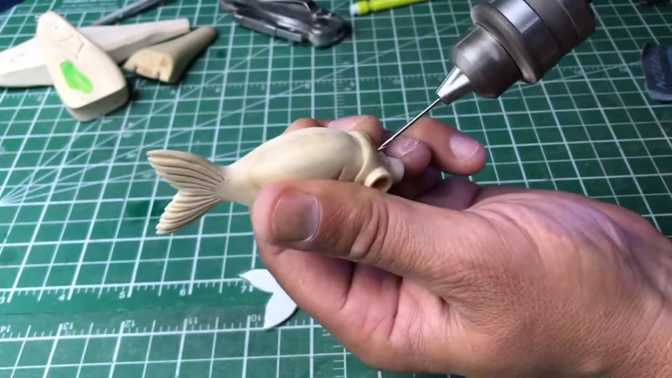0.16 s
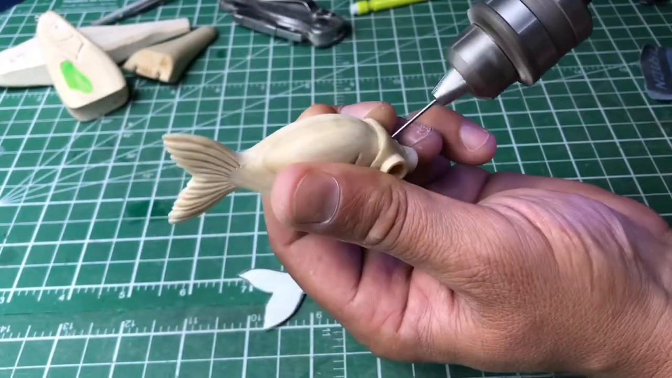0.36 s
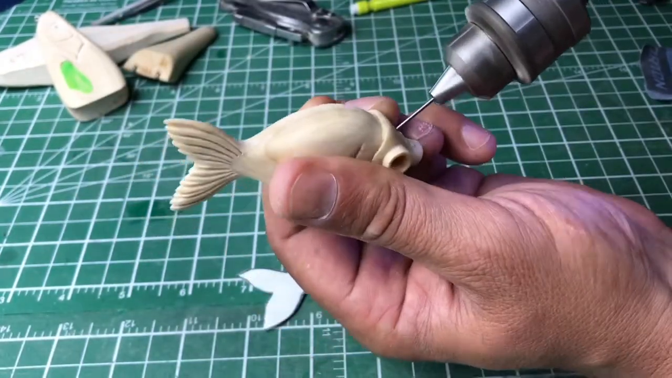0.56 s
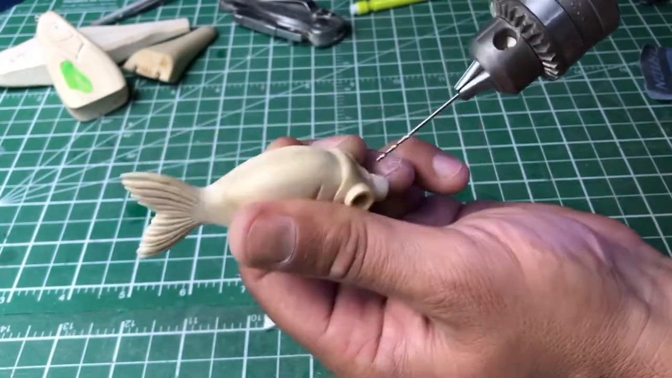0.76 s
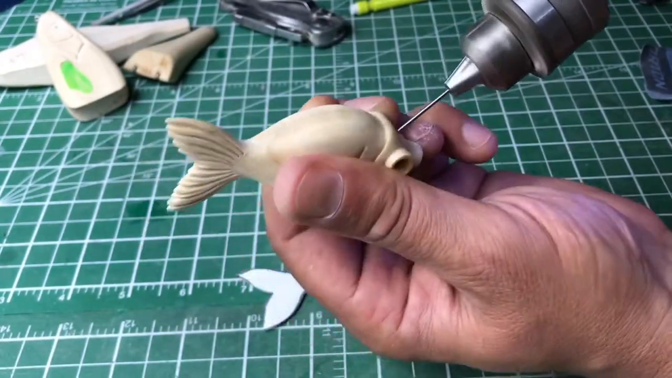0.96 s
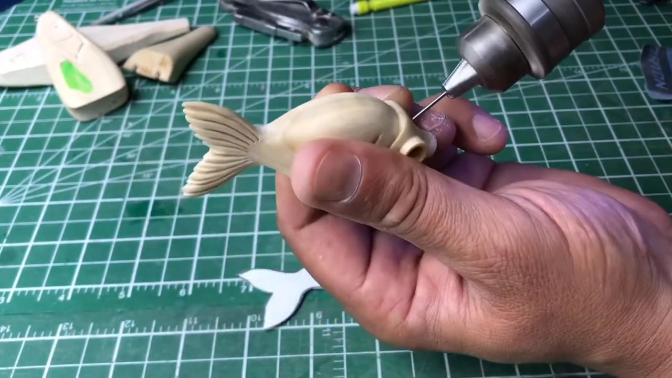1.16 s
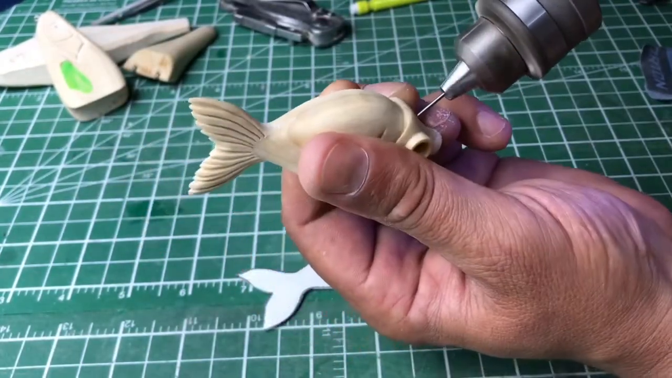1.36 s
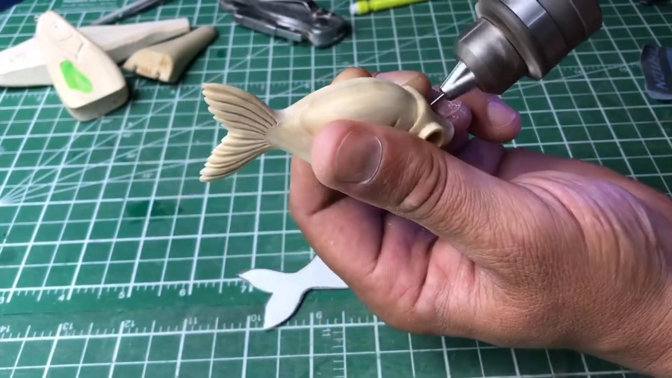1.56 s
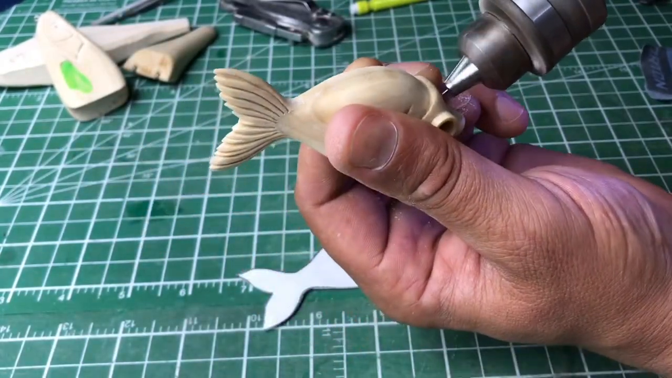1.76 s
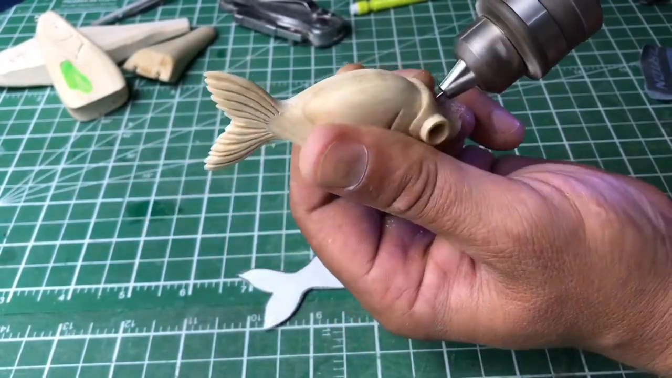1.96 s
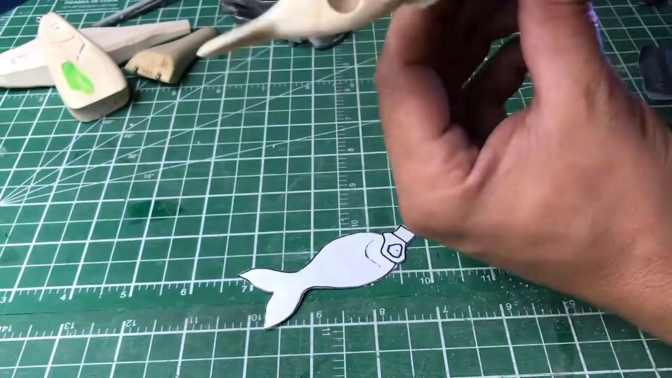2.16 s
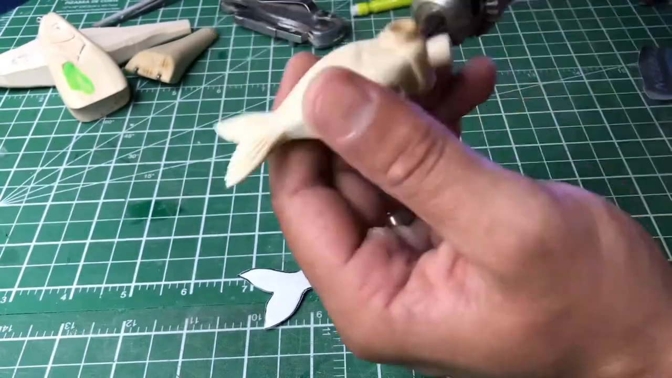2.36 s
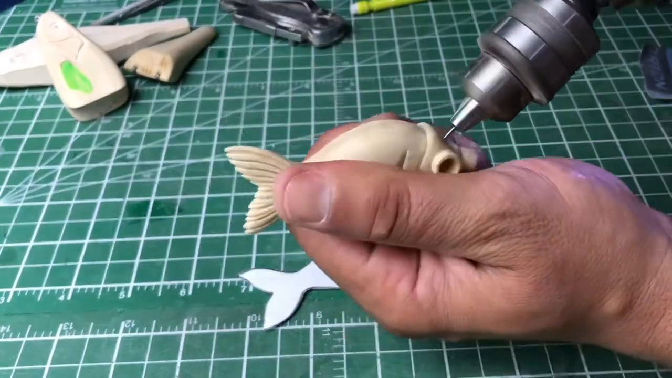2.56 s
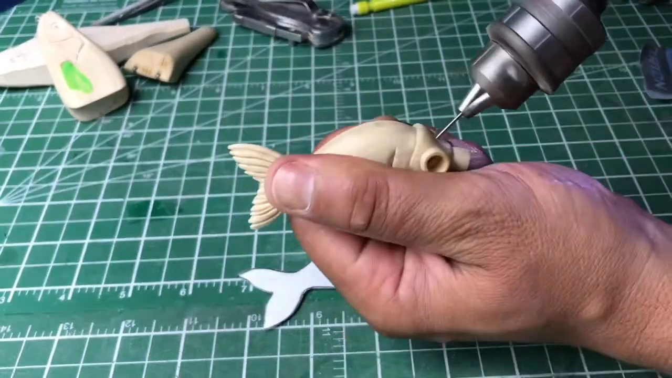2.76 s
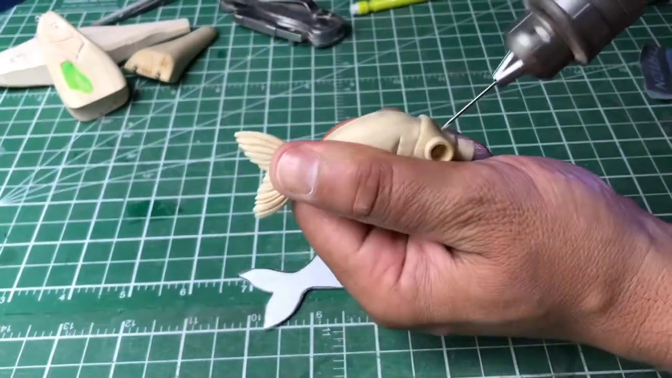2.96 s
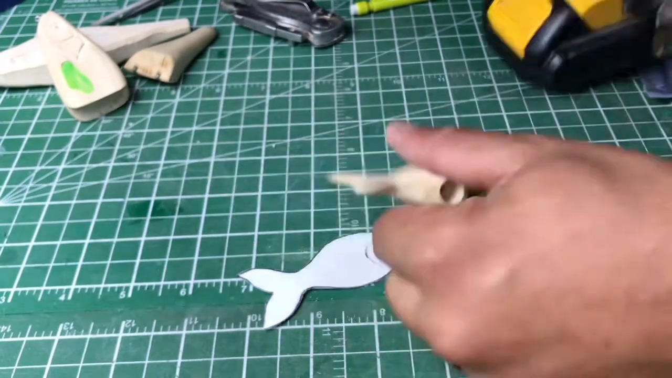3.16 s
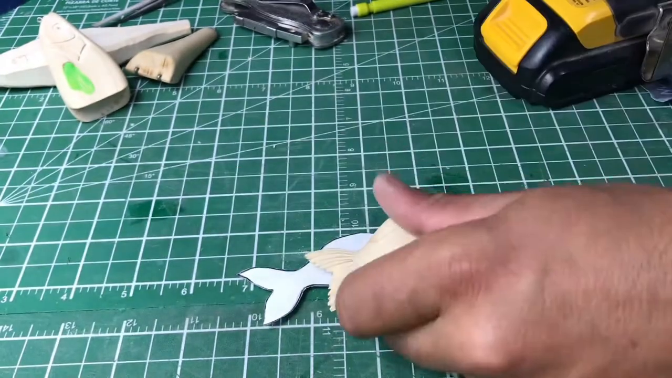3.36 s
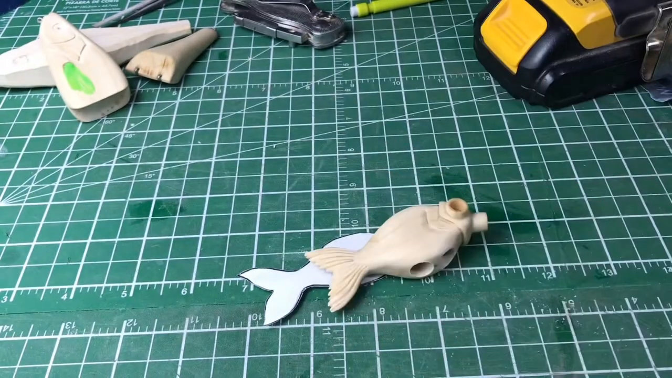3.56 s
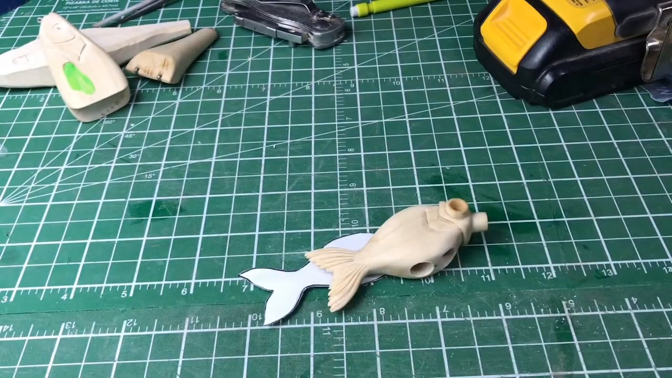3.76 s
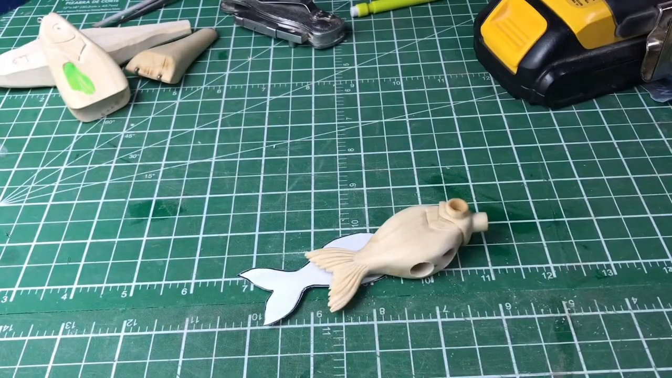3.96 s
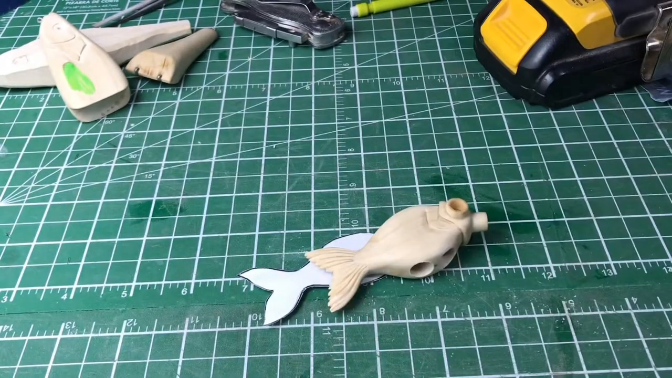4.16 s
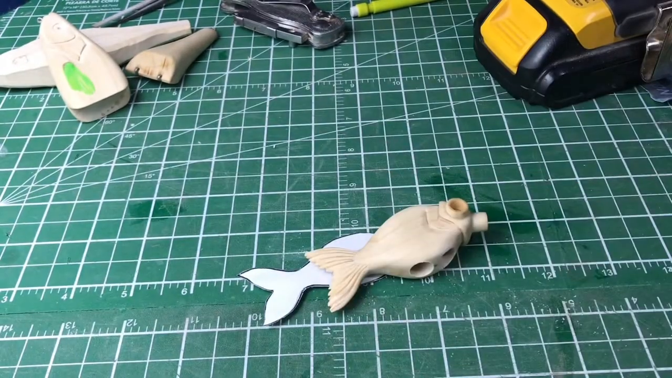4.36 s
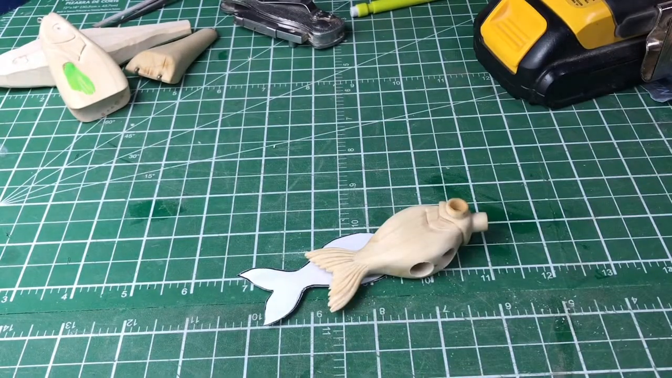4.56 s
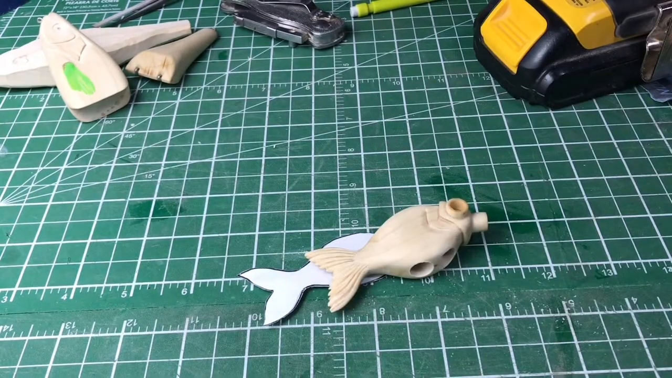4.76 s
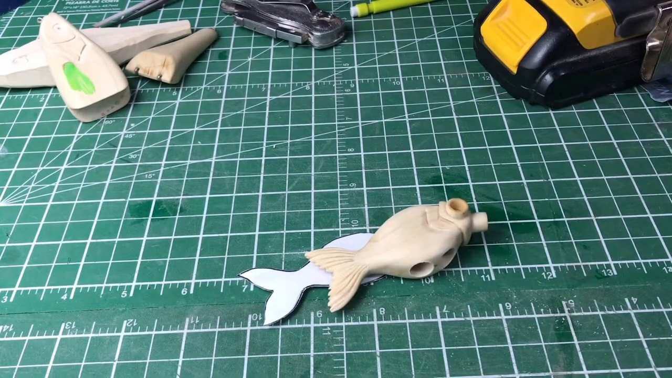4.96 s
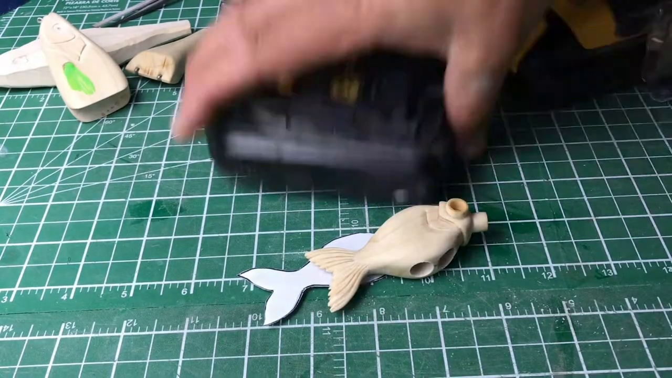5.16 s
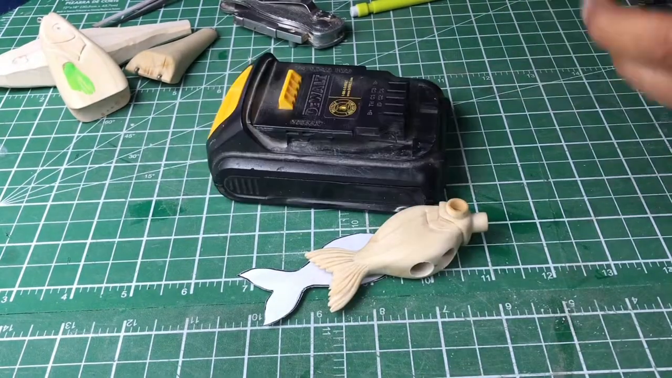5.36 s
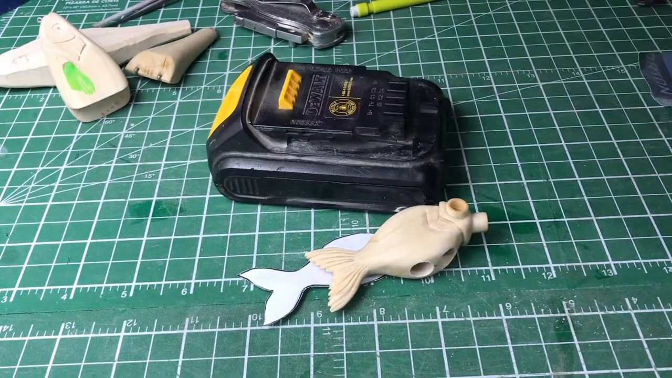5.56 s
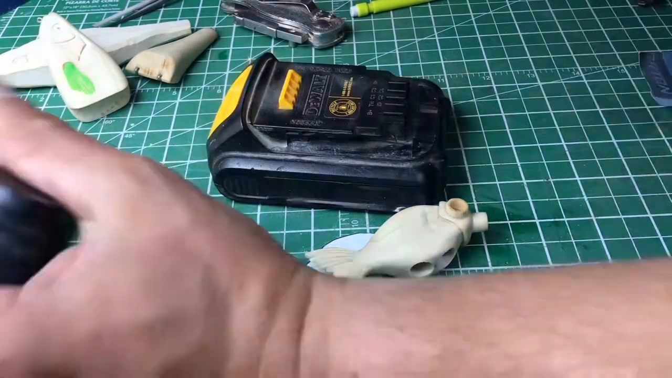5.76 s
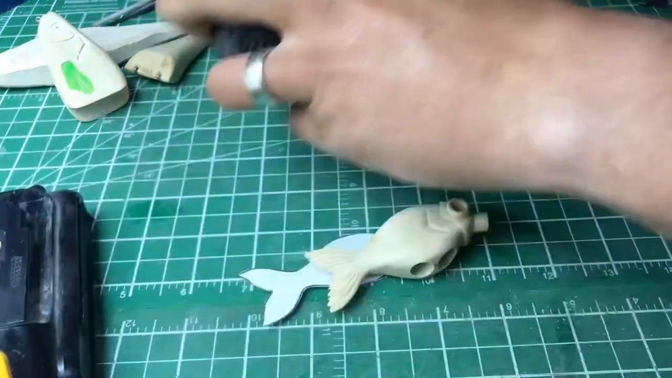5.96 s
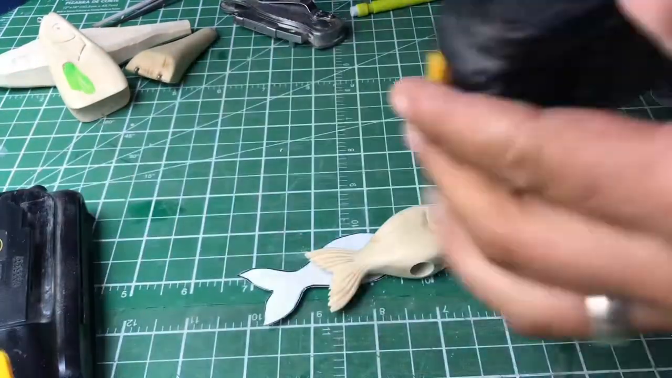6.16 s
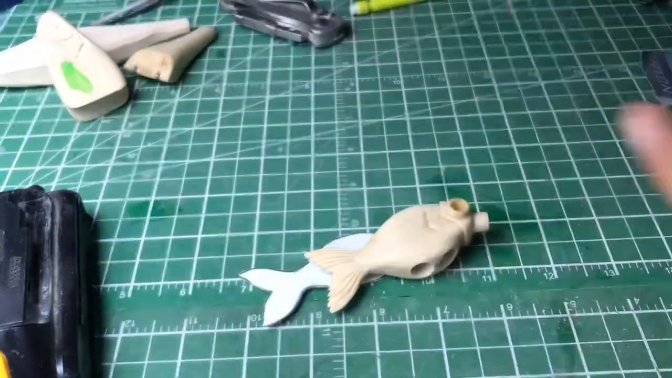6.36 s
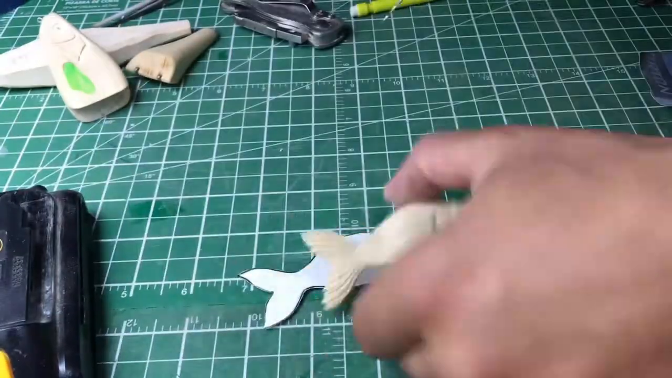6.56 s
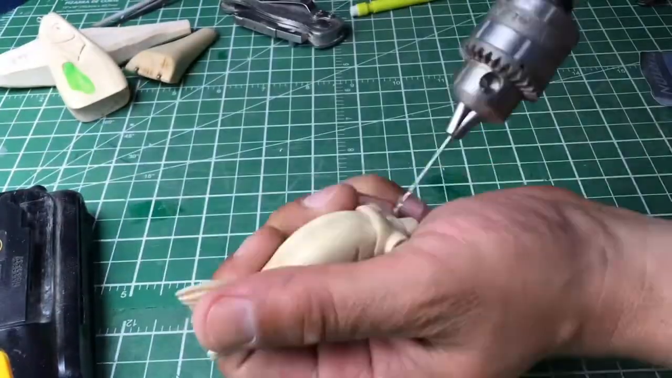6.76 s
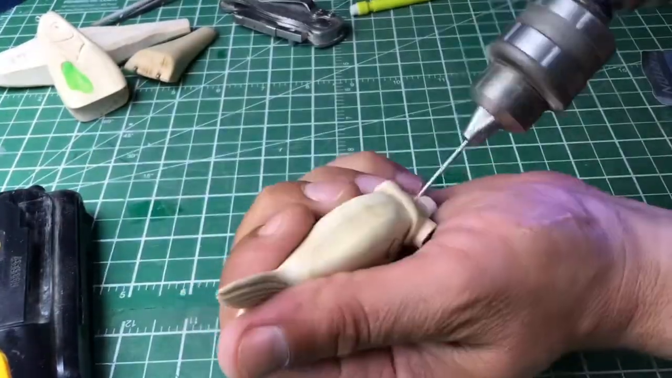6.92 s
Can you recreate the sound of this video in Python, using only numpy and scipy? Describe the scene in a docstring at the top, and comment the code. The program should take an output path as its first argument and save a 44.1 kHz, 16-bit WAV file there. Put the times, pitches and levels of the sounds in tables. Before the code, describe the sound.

Close, dry workshop sound of a small electric drill boring a wooden carving. Two bright, raspy whining bursts sag in pitch, then a slower, weaker one. The tool scrapes and knocks on a matted bench, a plastic battery clicks off and another snaps in with sharp clacks. After a quiet moment of light handling, the drill spins up freely, rising to a high whine as it ends.

```python
"""A small hand drill runs in four short bursts, boring into a wooden carving and at last spinning free.
Every line of the motor is locked to the shaft; armature and gears whine over the rasp of the brushes.
Each burst spins up, and all but the last then sag. Before the last one the tool knocks on the bench,
its plastic battery is pulled off and a fresh one snapped in: blows that ring modes with a crack and a tick.
Skin crackle, small ringing parts, a faint echo, room air and a late low hum lie underneath."""
import sys
import numpy as np
from scipy import signal
from scipy.fft import rfft, irfft
from scipy.io import wavfile
from scipy.ndimage import uniform_filter1d, map_coordinates

SR = 44100
rng = np.random.default_rng(int(sys.argv[2]) if len(sys.argv) > 2 else 0)


def wrap_up_sound(samples):
    """Save the sound to the file named by the first command line argument, as 16-bit audio."""
    columns = np.atleast_2d(samples).T
    # keep every value between -1 and 1, then stretch to whole-number steps
    tamed = np.clip(columns, -1, 1)
    steps = np.round(tamed * 32767).astype(np.int16)
    wavfile.write(sys.argv[1], SR, steps)


N = 312669
TIME = np.arange(N) / SR  # s
TOP_HZ = 15950  # upper band limit


def undb(db):
    """Level law: decibels to amplitude gain."""
    return 10 ** (np.asarray(db) / 20)


def unit(x):
    """Normalisation: scale to rms 1."""
    return x / np.sqrt(np.mean(x ** 2))


def colour(x, points):
    """Minimum-phase filtering: (frequency [Hz], gain [dB]) points become a causal response by the cepstrum."""
    size = 4096
    hz, db = np.transpose(points)
    bin_hz = np.arange(size // 2 + 1) * SR / size
    gain_db = np.interp(np.log(bin_hz + 1), np.log(hz), db)
    cepstrum = irfft(np.log(undb(gain_db)))
    # folding the cepstrum onto positive time makes the response causal
    cepstrum[1:size // 2] *= 2
    cepstrum[size // 2 + 1:] = 0
    response = irfft(np.exp(rfft(cepstrum)))
    return signal.fftconvolve(x, response)[:len(x)]


def walk(t, rate):
    """Band-limited fluctuation: random knots, rate per second, joined smoothly, with spread near 1."""
    steps = (t - t[0]) * rate
    knots = rng.standard_normal(int(steps[-1]) + 2)
    return map_coordinates(knots, [steps], order=3, mode="nearest")


def shaft_speed(t, speed):
    """Rotor inertia: the speed curve is rounded, wavers slightly, and falls under the brake."""
    rows = np.array(speed)
    stop = rows[-1, 0]
    hz = uniform_filter1d(np.interp(t, *rows.T), size=600, mode="nearest")
    hz = hz * (1 + 0.0011 * walk(t, 72.4))
    # the trigger is let go just before the end, unless the scene ends first
    if stop < TIME[-1] - .1:
        hz = hz * np.exp(-np.maximum(t - stop + 0.009, 0) / 0.08)
    return hz


def line(t, angle, multiple, play, flutter_db):
    """Phase locking: a partial of rms near 1 follows the shaft, loosened by play [rad] in the bearings."""
    phase = multiple * angle + rng.uniform(0, 2 * np.pi) + play * walk(t, 180)
    return np.sqrt(2) * np.sin(phase) * undb(flutter_db * walk(t, 90.9))


# the carving radiates little of the shaft hum below its corner; level against the cutting
SHAFT_HUM_DB, HUM_CORNER_HZ = 1.5, 527
HUM_SWELL_S = 0.069  # the hum swells in from the start of a burst


def shaft_hum(t, start, hz, angle, cut_db):
    """Low-frequency radiation limit: shaft hum is radiated well only above a corner frequency."""
    swell = np.clip((t - start) / HUM_SWELL_S, 0, 1) ** 2
    radiated = undb(cut_db + SHAFT_HUM_DB) / (1 + (HUM_CORNER_HZ / hz) ** 10)
    return swell * radiated * line(t, angle, 0.99, play=0.38, flutter_db=2.0)


SLOTS, GEAR_MESH = 7, 16.06  # multiples of the shaft rate
# the load is full once the speed has sagged by this share of its peak so far
FULL_LOAD_SAG, ARMATURE_LOAD_DB, GEAR_LOAD_DB = 0.14, 3.5, 12.5
# resonances of the motor shell: (frequency [Hz], gain [dB])
SHELL_RESONANCES = [(2100, -28.5), (2900, -18.5), (3300, -11.5), (3950, -0.5), (4450, -14), (4950, -18.5),
                    (5400, -26.5), (6000, -16), (6330, -5.5), (6800, -5), (7500, -18.5), (8950, 0),
                    (10600, -8.5), (12300, 4), (13200, 5), (14700, 1.5), (16000, 2)]


def armature_and_gears(t, hz, angle, armature_db, octave_db, gear_db):
    """Order tracking through resonances: whines flare as they glide, and two of them harden as the speed sags."""
    def shell(multiple):
        gain_db = np.interp(multiple * hz, *np.transpose(SHELL_RESONANCES))
        return undb(armature_db + gain_db) * (multiple * hz < TOP_HZ)

    load = np.clip((1 - hz / np.maximum.accumulate(hz)) / FULL_LOAD_SAG, 0, 1)
    armature = line(t, angle, SLOTS, play=.1, flutter_db=0.73)
    octave = line(t, angle, 2 * SLOTS, play=0.26, flutter_db=0.75)
    gears = line(t, angle, GEAR_MESH, play=0.48, flutter_db=2.0)
    whine = undb(ARMATURE_LOAD_DB * (load - 1)) * shell(SLOTS) * armature
    whine += undb(octave_db) * shell(2 * SLOTS) * octave
    whine += undb(gear_db + GEAR_LOAD_DB * (load - 1.5)) * shell(GEAR_MESH) * gears
    return whine


# how the housing radiates: (frequency [Hz], gain [dB])
HOUSING_RADIATION = [(400, -49.5), (1500, -14.5), (2200, -9), (2700, -16), (3700, -3), (4400, -10.5),
                     (5100, -16.5), (5900, -8.5), (6700, -5), (8000, -4.5), (9200, -1.5), (10500, -2.5),
                     (13000, 1.5), (15700, 0.5)]
# weaker lines of the motor: (multiple of the shaft rate [1], relative level [dB])
MOTOR_LINES = [(2, -8), (3, -13), (4, -16), (5, -13.5), (6, -19.5), (8, -18), (9, -14.5), (10, -29),
               (11, -21), (12, -18), (13, -11.5), (15, -5.5), (17, -6), (19, -11), (20, -21), (21, -5.5),
               (26, -8.5), (27, -20), (28, -8.5), (34, -6.5)]
# weaker lines of the gearbox: (multiple of the shaft rate [1], relative level [dB])
GEARBOX_LINES = [(7.7, -14.5), (11.38, -10), (13.75, -17), (15.56, -4.5), (30.88, -6), (31.12, -36),
                 (32.12, -4.5)]


def weak_lines(t, hz, angle):
    """Order spectrum: further motor and gearbox partials, weighted by the radiation of the housing."""
    housing_hz, housing_db = np.transpose(HOUSING_RADIATION)
    total = 0
    for multiple, db in MOTOR_LINES + GEARBOX_LINES:
        radiated_db = np.interp(np.log(multiple * hz), np.log(housing_hz), housing_db)
        gain = undb(db + radiated_db) * (multiple * hz < TOP_HZ)
        total = total + gain * line(t, angle, multiple, play=0.044 * multiple, flutter_db=3.5)
    return total


def brush_rasp(t, angle):
    """Amplitude-modulated noise: sparks come in uneven spurts as the slots pass the brushes."""
    slot_beat = 1 + 0.56 * np.cos(SLOTS * angle)
    shaft_beat = 1 + 0.42 * np.cos(angle)
    sparks = rng.standard_normal(len(t)) * slot_beat * shaft_beat * undb(1.1 * walk(t, 860))
    return unit(colour(colour(sparks, HOUSING_RADIATION), [(9000, 0.026), (14000, 2.8)]))


# the carving and the bit that cuts it: (frequency [Hz], gain [dB])
CARVING_RESPONSE = [(200, -40.5), (450, -5), (720, 9.5), (1000, -5), (1280, -1.5), (1650, 7.5), (2100, 2.5),
                    (2800, -8.5), (3700, -9), (4600, -17), (7000, -14)]


def cutting(t, angle):
    """Filtered fracture noise: the flutes tear fibres in time with the chuck, geared down 22 to 1."""
    fibres = rng.standard_normal(len(t)) * undb(0.97 * walk(t, 350))
    return unit(colour(fibres * (1 + 0.11 * np.cos(angle / 22)), CARVING_RESPONSE))


RATED_HZ, RASP_DB_PER_OCTAVE = 1000, 3.5  # the rasp grows with shaft speed
COAST_S = 0.0068  # decay constant of the sound after the last speed point


def drill(speed, rasp_db, armature_db, octave_db, gear_db, lines_db, cut_db):
    """Superposition on one shaft: a pull of the trigger sums hum, whine, brush rasp, weak lines and cutting."""
    start, stop = speed[0][0], speed[-1][0]
    on = (TIME > start - .01) & (TIME < stop + .06)
    t = TIME[on]
    hz = shaft_speed(t, speed)
    angle = 2 * np.pi * np.cumsum(hz) / SR
    table_hz = np.interp(t, *np.transpose(speed))
    brush_db = rasp_db + RASP_DB_PER_OCTAVE * np.log2(table_hz / RATED_HZ)
    sound = shaft_hum(t, start, hz, angle, cut_db)
    sound += armature_and_gears(t, hz, angle, armature_db, octave_db, gear_db)
    sound += undb(brush_db) * (brush_rasp(t, angle) + undb(lines_db) * weak_lines(t, hz, angle))
    sound += undb(cut_db) * cutting(t, angle)
    fade_in = np.clip((t - start + 0.0035) / 0.012, 0, 1)
    coast = np.exp(-np.maximum(t - stop, 0) / COAST_S)
    out = np.zeros(N)
    out[on] = sound * fade_in * coast
    return out


# motor speed in the first burst, spinning up and sagging: (time [s], shaft rate [Hz])
FIRST_SPEED = [(0.03, 299.6), (0.036, 376), (0.042, 466), (0.05, 574), (0.062, 727), (0.07, 789),
               (0.1, 940), (0.132, 1022), (0.178, 1078), (0.244, 1016), (0.43, 911), (0.512, 907),
               (0.552, 883), (0.61, 884)]
# the second burst, with a long deep sag: (time [s], shaft rate [Hz])
SECOND_SPEED = [(0.78, 293), (0.788, 390), (0.8, 508.6), (0.828, 684.7), (0.856, 780), (0.884, 829),
                (0.924, 864.3), (1.004, 741.8), (1.126, 666.7), (1.238, 635.7), (1.314, 573.5),
                (1.404, 563), (1.48, 520.5), (1.566, 508.5), (1.64, 457.1), (1.716, 427), (1.885, 419)]
# the third burst, slow and sagging: (time [s], shaft rate [Hz])
THIRD_SPEED = [(2.31, 241.4), (2.33, 328), (2.35, 400.6), (2.396, 472.5), (2.462, 389.3), (2.636, 332),
               (2.72, 329.3), (2.772, 296.3), (2.93, 292.8)]
# the fourth burst, spinning up freely until the scene ends: (time [s], shaft rate [Hz])
FOURTH_SPEED = [(6.755, 187.6), (6.765, 283.7), (6.779, 412), (6.793, 560), (6.817, 767), (6.837, 856.9),
                (6.957, 1196), (7.001, 1275), (7.09, 1298)]


def bursts():
    """Speed-controlled excitation: four pulls of the trigger, the last unloaded with its cutting nearly silent."""
    out = drill(FIRST_SPEED, rasp_db=-44.5, armature_db=-43.5, octave_db=-7.5, gear_db=0,
                lines_db=-5.5, cut_db=-60)
    out += drill(SECOND_SPEED, rasp_db=-45, armature_db=-42, octave_db=-7, gear_db=-6,
                 lines_db=-6.5, cut_db=-59.5)
    out += drill(THIRD_SPEED, rasp_db=-46.3, armature_db=-39.5, octave_db=-11.5, gear_db=-11.5,
                 lines_db=-6.5, cut_db=-77.5)
    out += drill(FOURTH_SPEED, rasp_db=-44.5, armature_db=-41, octave_db=-10.5, gear_db=-8,
                 lines_db=-8.5, cut_db=-76)
    return out


# the crack of a contact: (frequency [Hz], gain [dB])
CRACK_SPECTRUM = [(100, -41.5), (600, -18), (1900, -11), (2700, -5.5), (3300, -4.5), (4200, -1.5),
                  (5200, -4), (6100, -7.5), (7000, -3), (8500, -9), (16000, -40.5)]
# the tick of a contact: (frequency [Hz], gain [dB])
TICK_SPECTRUM = [(2000, -33), (6000, -12), (8000, -4.5), (11000, -0.5), (14000, -4), (16000, -1)]


def hits(blows, modes, thump, chatter, spot_db, tail_db, tail_s, crack_s, tick_s, body_db, crack_db, tick_db):
    """Modal impact: each blow rings the body's modes; the rough contact adds a crack and a tick with faint tails."""
    out = np.zeros(N + SR)
    t = TIME[:SR // 5]
    mode_hz, mode_db, t60 = np.transpose(modes)[:, :, None]
    for s, low, middle, treble, contact_ms, spot_hz in blows:
        grit = rng.standard_normal((3, len(t)))
        strike, detune = rng.standard_normal((2, len(modes), 1))
        contact_s = max(contact_ms, .1) / 1000
        # every blow lands on another spot and weights the modes anew
        spot = [(spot_hz / 1.25, 0), (spot_hz, spot_db), (spot_hz * 1.25, 0)]
        weight_db = mode_db + np.interp(mode_hz, *np.transpose(spot)) + 2.6 * strike
        partials = np.cos(2 * np.pi * mode_hz * (1 + .006 * detune) * t)
        ring = np.sum(undb(weight_db - 60 * t / t60) * partials, axis=0)
        # one firm push, then the surfaces chatter until they settle
        push = chatter * grit[0] * np.exp(-t / contact_s)
        push[0] += 1
        body = colour(signal.fftconvolve(push, ring)[:len(t)], thump)
        tail = undb(tail_db) * np.exp(-t / tail_s)
        crack_envelope = np.exp(-t / (contact_s + crack_s)) + tail
        tick_envelope = np.exp(-t / (contact_s + tick_s)) + tail / 2
        crack = colour(colour(grit[1] * crack_envelope, CRACK_SPECTRUM), spot)
        tick = colour(grit[2] * tick_envelope, TICK_SPECTRUM)
        # a blunt blow, with more crack than tick, loses the very top
        tick = colour(tick, [(9000, 0.0071), (14000, min(0, 0.2 * (treble - middle)))])
        first = int(s * SR)
        for part, db in ((body, low + body_db), (crack, middle + crack_db), (tick, treble + tick_db)):
            # levels are the energy of the blow spread over 10 ms
            out[first:first + len(t)] += undb(db) * part / np.sqrt(np.sum(part ** 2) / (SR / 100))
    return out[:N]


# the tool bumping on the bench: (time [s], relative body level [dB], crack against body [dB],
# contact decay [ms], frequency favoured by the struck spot [Hz])
BENCH_KNOCKS = [(2.8875, -50, -10, 2.7, 646), (3.788, -57.5, -24, 5.4, 1050),
                (4.0215, -42.5, -29, 5.6, 1050), (4.0945, -48, -37, 1, 600), (4.107, -43.5, -23, 7.5, 560),
                (4.148, -32, -10.5, 4.5, 740), (4.153, -32, -9.5, 3.3, 868), (4.3075, -29, -30, 2.5, 932),
                (4.3588, -19.5, -17, 3.1, 1160), (4.3717, -20.5, -18, 3.9, 967),
                (4.3977, -33.5, -31.5, 4, 1140), (4.78, -57, 3, 1.5, 680), (4.785, -49.5, -13, 5.5, 666),
                (4.795, -54.5, 1, 1.4, 680)]
# modes of the bench, also rung by the slides: (frequency [Hz], level [dB], decay by 60 dB [s])
BENCH_RESONANCES = [(390, -23, .04), (598, -7, 0.068), (666, -4, .06), (739, -7.5, 0.083),
                    (874, -6.5, 0.031), (927, -13.5, 0.046), (1046, -2, 0.039), (1394, 0.5, 0.035),
                    (1466, -1, 0.041), (1630, -9, 0.025), (1835, -7, 0.023), (1905, -9, 0.025),
                    (2070, -10.5, .025), (2460, -6.5, 0.031), (2765, -9.5, 0.06), (3380, -9.5, 0.037)]
# the push of a blow on the soft mat: (frequency [Hz], gain [dB])
SOFT_MAT_PUSH = [(100, -23), (300, -10), (520, 4.5), (800, -4), (1070, 2.5), (1200, -17.5), (1420, 0.5),
                 (2000, -1), (2600, -3.5), (4200, -19), (9000, -28.5)]


def knocks():
    """Soft-contact impact: the tool bumps on the mat, exciting bench modes with a crack and a weaker tick."""
    blows = []
    for s, db, crack, contact_ms, spot_hz in BENCH_KNOCKS:
        blows.append((s, db, db + crack, db + crack - 7, contact_ms, spot_hz))
    return hits(blows, BENCH_RESONANCES, SOFT_MAT_PUSH, chatter=0.11, spot_db=14.5, tail_db=-18.5, tail_s=.012,
                crack_s=0.0013, tick_s=.001, body_db=0.5, crack_db=-4.0, tick_db=-3.5)


# plastic clacks of trigger, brake, latch and battery: (time [s], relative level [dB], brightness [dB],
# contact decay [ms], frequency favoured by the struck spot [Hz])
PLASTIC_CLACKS = [(0.047, -56, 7, 2.4, 3800), (0.6122, -32, 7, .5, 6500), (0.616, -38, -2.5, 1.1, 2460),
                  (0.621, -40.5, -2.5, 0.92, 3880), (0.6294, -54, 3, 1.15, 3750), (0.783, -58, 0, 3, 3700),
                  (1.881, -55, -5, 6, 3760), (2.312, -51, 3, 5, 3630), (2.927, -47, 4.5, .9, 3965),
                  (3.0612, -45.5, -2.5, 1.4, 3400), (3.076, -44, -2, 0.81, 3450),
                  (3.0941, -57.5, -15, 4.4, 2510), (3.2205, -39.5, -3.5, 1.1, 4220),
                  (5.0572, -24, 2, .7, 4130), (5.0597, -28, 1, .7, 4200), (5.278, -63.5, 5, 3.4, 3850),
                  (5.4643, -58, 8, 1.2, 3810), (5.4773, -64, 2, 1, 3800), (5.49, -41, 10, .4, 3460),
                  (5.545, -47, 8.5, 3, 4200), (5.643, -38, -15.5, 1.1, 2700),
                  (5.652, -40.5, -17.5, 2.3, 2660), (5.67, -54, 12.5, 1, 7000),
                  (5.6786, -23.5, 0.5, .5, 2800), (5.6855, -31.5, -2.5, 1, 2820),
                  (5.6952, -20, -3, 1.4, 2660), (5.706, -26, -3, .5, 2890), (5.9245, -43, 5, 2, 6790),
                  (5.9462, -47, 9, 1, 5360), (5.9553, -46.5, 7, 5.6, 6730), (5.9585, -40.5, 13, 1.1, 6900),
                  (5.989, -51, 10, 5.8, 7040), (6.0115, -48, 19, .8, 4370), (6.1533, -49, 7, 1, 5910),
                  (6.1598, -34, 9, 1, 4500)]
# modes of the plastic case: (frequency [Hz], level [dB], decay by 60 dB [s])
CASE_RESONANCES = [(463, -22, 0.004), (680, -12.5, 0.03), (753, -14, 0.036), (1120, -5, 0.0071),
                   (1115, -2.5, 0.032), (1290, 0.5, 0.017), (1440, -1.5, 0.033), (1600, -10.5, 0.04),
                   (1707, -5.5, 0.03), (2200, -4, 0.024)]
# the push of a blow on hard plastic: (frequency [Hz], gain [dB])
HARD_PLASTIC_PUSH = [(80, -2.5), (200, -14), (420, 1), (800, 2), (1100, 0), (1550, 6.5), (2400, -3.5),
                     (5000, -15.5), (10000, -29)]


def clacks():
    """Hard-contact impact: the brighter the meeting of plastics, the less body and the more tick."""
    blows = []
    for s, db, bright, contact_ms, spot_hz in PLASTIC_CLACKS:
        blows.append((s, db - 3.5 - bright, db, db - 5 + bright, contact_ms, spot_hz))
    return hits(blows, CASE_RESONANCES, HARD_PLASTIC_PUSH, chatter=0.18, spot_db=10.5, tail_db=-17.5,
                tail_s=0.0046, crack_s=0.00074, tick_s=0.00022, body_db=-2.5, crack_db=-2.1, tick_db=1.4)


# springs and contacts ringing on: (time [s], frequency [Hz], level [dB], decay by 60 dB [s])
METAL_RINGS = [(5.058, 6750, -57, .27), (5.696, 5986, -65, .27), (5.696, 7090, -69, .3),
               (6.012, 12800, -63, .17), (6.16, 7500, -66, .2)]


def rings():
    """Free damped vibration: small metal parts sing on as decaying sines."""
    out = 0
    for s, hz, db, t60 in METAL_RINGS:
        age = np.maximum(TIME - s, 0)
        out = out + undb(db - 60 * age / t60) * np.sin(2 * np.pi * hz * age)
    return out


def slide(start, stop, slide_db):
    """Friction excitation: the drill drags over the mat, its dense slips ringing the bench modes."""
    t = TIME[:SR // 8]
    ring = 0
    for k, (hz, db, t60) in enumerate(BENCH_RESONANCES):
        ring = ring + (-1) ** k * undb(db - 60 * t / t60) * np.sin(2 * np.pi * hz * t)
    slips = rng.standard_normal(N) * undb(3 * walk(TIME, 220))
    swell = np.sin(np.pi * np.clip((TIME - start) / (stop - start), 0, 1))
    groan = colour(signal.fftconvolve(slips, ring)[:N],
                   [(150, -15.5), (600, 3.0), (1050, 0.0), (1450, -13.5), (2500, -23.5)])
    scrape = colour(slips, [(150, -23), (600, 10), (1600, 7.5), (3000, -9), (4500, -17.5), (15000, -22.5)])
    return undb(slide_db) * swell * (undb(-3) * unit(groan) + undb(-2.5) * unit(scrape))


# the firmest shifts of the fingers on wood and plastic: (time [s], relative level [dB])
FINGER_SHIFTS = [(0.679, -72), (0.73, -75), (1.962, -73), (2.028, -69.5), (2.204, -71), (3.02, -61.5),
                 (3.294, -68), (3.43, -68.5), (3.502, -64), (3.534, -57.5), (3.569, -63), (3.592, -55),
                 (3.677, -72.5), (3.767, -66), (3.92, -59), (4.236, -64.5), (4.463, -56.5), (4.595, -67),
                 (4.702, -59.5), (5.324, -69), (5.572, -59), (5.812, -64), (5.847, -64.5), (6.272, -64.5)]
RUB_RISE_S = 0.0045
# the hands are busier between the third and the fourth burst
BUSY_FROM_S, BUSY_TO_S, BUSY_DB = 3.0, 5.05, 1


def fingers(rub_db, grip_db):
    """Granular friction: each shift of grip is a short swell of skin crackle; the hand never quite rests."""
    busy = (TIME > BUSY_FROM_S) & (TIME < BUSY_TO_S)
    gain = undb(grip_db + BUSY_DB * busy + 2 * walk(TIME, 20))
    for s, db in FINGER_SHIFTS:
        age = np.maximum(TIME - s, 0) / RUB_RISE_S
        gain = gain + undb(db + rub_db) * (age * np.exp(1 - age)) ** 2
    grains = rng.standard_normal(N) * undb(1.2 * walk(TIME, 640))
    skin = [(200, -23.5), (1200, 3.5), (3000, -2.0), (7000, -4.5), (12000, -3.5), (16000, -9)]
    return gain * unit(colour(grains, skin))


def reflections(x, wet_db, t60):
    """Diffuse reverberation: bench and walls return a faint short echo of exponentially decaying noise."""
    t = TIME[:SR // 3]
    echo = rng.standard_normal(len(t)) * undb(-60 * t / t60) * (t > .004)
    response = colour(echo, [(200, 1.5), (1200, -5.5), (4000, -15.5), (15000, -5.0)])
    return undb(wet_db) * signal.fftconvolve(x, response / np.sqrt(np.sum(response ** 2)))[:N]


# spectrum of the workshop air: (frequency [Hz], relative spectral density [dB])
AIR_SPECTRUM = [(24, -70.5), (40, -42.5), (133, -28), (262, -7.5), (467, -2.5), (680, -4.5), (831, -8.5),
                (918, -8.5), (1440, -8), (1900, -12), (2840, -21), (6820, -20), (7360, -32), (8130, -27),
                (16000, -34.5)]
HUM_FROM_S, HUM_RISE_S = 6.42, 0.095  # the hum swells in near the end


def room_tone(air_db, hum_hz, hum_db):
    """Stationary background noise: quiet shaped air, and a faint late hum that wavers in phase."""
    air = colour(rng.standard_normal(N), AIR_SPECTRUM)
    air = colour(air, [(60, -4), (170, -1.5), (2000, -3.5), (6000, -7.5)])
    swell = np.clip((TIME - HUM_FROM_S) / HUM_RISE_S, 0, 1)
    hum = undb(hum_db) * swell * np.sin(2 * np.pi * hum_hz * TIME + 0.57 * walk(TIME, 14))
    return undb(air_db + 0.31 * walk(TIME, 12.0)) * unit(air) + hum


def scene():
    """Linear superposition: drill, handling and room, heard at one point and equal in both channels."""
    close = bursts() + knocks() + clacks()
    close += slide(start=3.835, stop=3.955, slide_db=-44.0)
    close += slide(start=3.995, stop=4.05, slide_db=-54.5)
    close += slide(start=4.09, stop=4.21, slide_db=-56)
    close += rings() + fingers(rub_db=-0.5, grip_db=-76.5)
    sound = close + reflections(close, wet_db=-42.0, t60=.22)
    sound += room_tone(air_db=-71, hum_hz=270, hum_db=-79)
    return np.array([sound, sound])


def record(dry):
    """Soft saturation and band limiting: the recorder rounds sharp peaks, thins the bass and cuts the top."""
    ceiling = .45
    rounded = ceiling * np.tanh(dry / ceiling)
    thin = signal.sosfilt(signal.butter(2, 130, "high", fs=SR, output="sos"), rounded)
    return signal.sosfilt(signal.ellip(10, .2, 70, TOP_HZ, fs=SR, output="sos"), thin)


dry = scene()
out = record(dry)
wrap_up_sound(out)
```